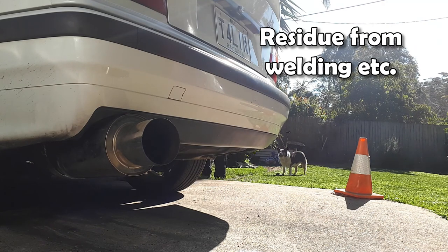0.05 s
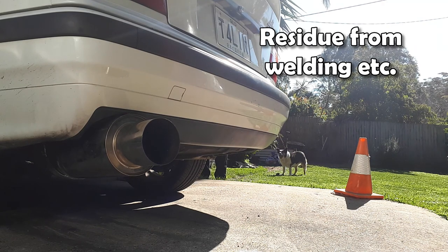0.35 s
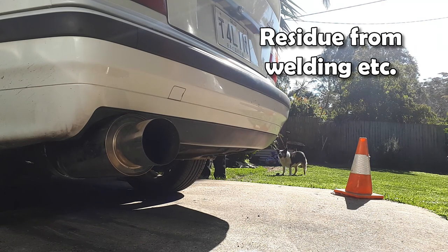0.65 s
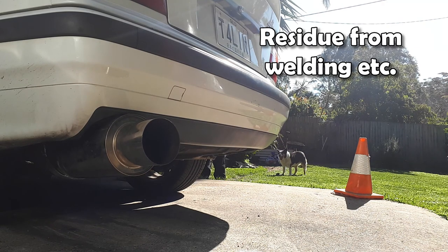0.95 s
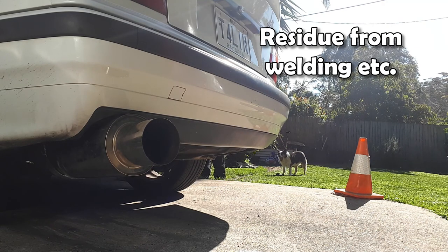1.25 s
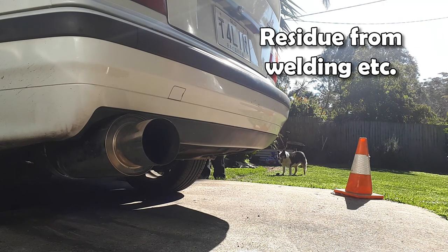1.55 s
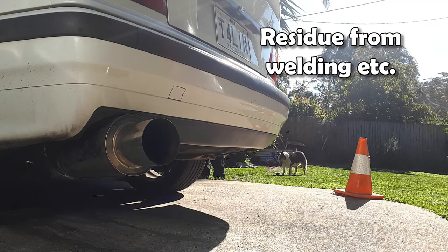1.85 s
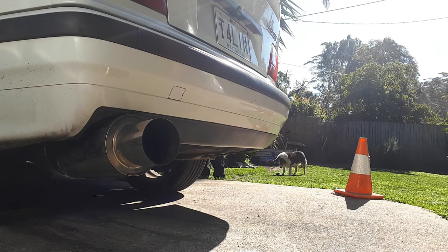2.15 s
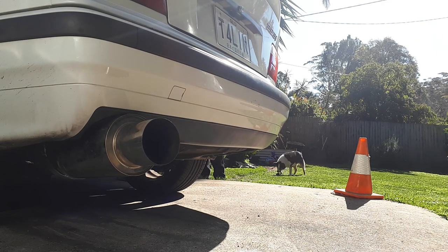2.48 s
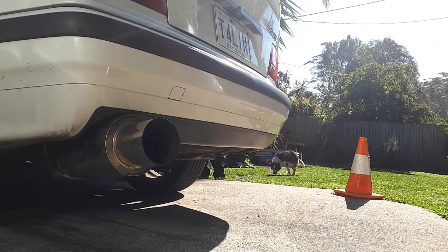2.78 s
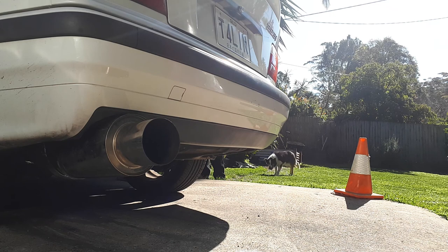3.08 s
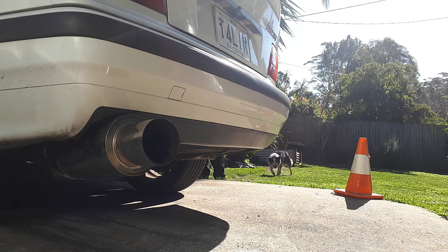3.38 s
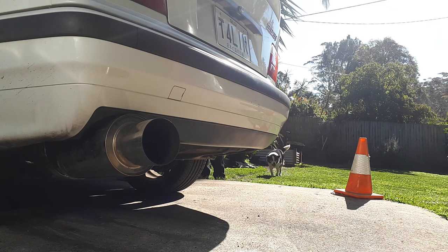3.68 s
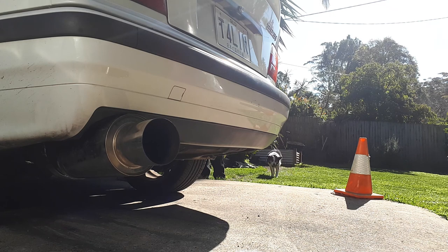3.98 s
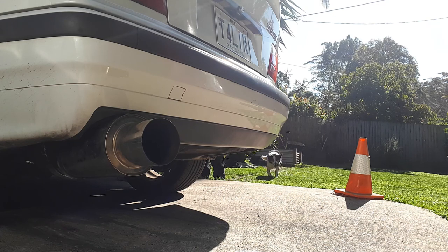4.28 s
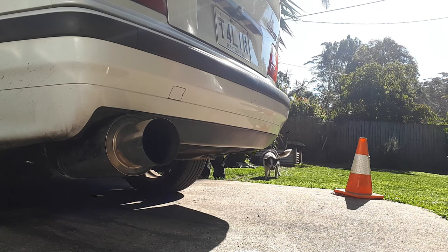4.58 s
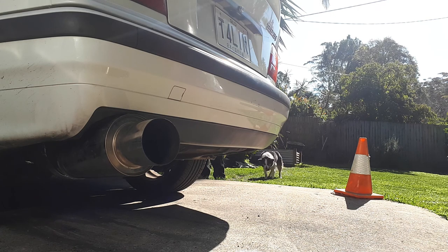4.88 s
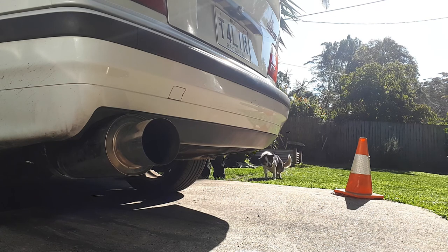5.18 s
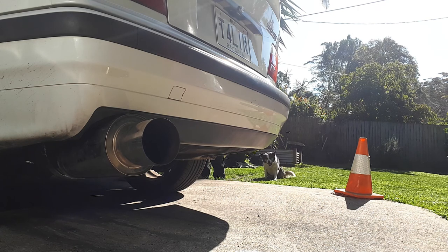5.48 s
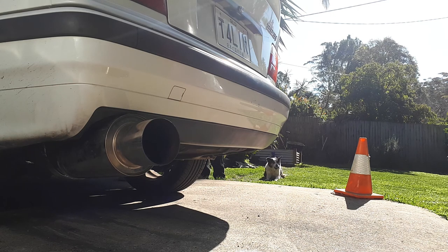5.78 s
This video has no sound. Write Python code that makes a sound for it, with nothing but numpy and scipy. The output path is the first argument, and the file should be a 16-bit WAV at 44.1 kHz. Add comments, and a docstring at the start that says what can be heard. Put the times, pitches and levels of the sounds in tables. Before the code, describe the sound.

A six-cylinder car idles with a deep, burbling exhaust and occasional sharp spits, slowly sinking into a harder lope.

```python
"""A six-cylinder car idles in a driveway, heard close to the mouth of its wide tailpipe.
From the start the exhaust booms on the firing orders, unequal puffs ring the pipe, gas rushes out and
each firing ticks, while the hiss and whine of the engine bay come from under the car.
After about a second and a half, sharper spits begin to crack now and then. Toward the end the fast idle
has sunk and the load has risen, so the exhaust lopes harder and the bay is louder."""
import sys
import numpy as np
from scipy import signal
from scipy.fft import rfft, irfft
from scipy.io import wavfile
from scipy.ndimage import uniform_filter1d, minimum_filter1d

SR = 44100
rng = np.random.default_rng(int(sys.argv[2]) if len(sys.argv) > 2 else 0)


def persist_wave(psi):
    """Save psi, clipped to +-1, as 16-bit WAV."""
    counts = np.round(np.clip(psi, -1, 1) * 32767).astype(np.int16)
    wavfile.write(sys.argv[1], SR, np.atleast_2d(counts).T)


N = 261954
TIME = np.arange(N) / SR


def amp(db):
    return 10 ** (np.asarray(db) / 20)


def unit_rms(x):
    return x / np.sqrt(np.mean(x ** 2) + 1e-20)


def shaped_noise(spectrum):
    """Noise of rms 1 through an EQ curve, falling 40 dB an octave beyond its ends."""
    hz, db = np.transpose(spectrum)
    f = np.fft.rfftfreq(N, 1 / SR) + 1
    octaves_outside = np.maximum(np.log2(f / hz[-1]), 0) + np.maximum(np.log2(hz[0] / f), 0)
    eq_db = np.interp(np.log(f), np.log(hz), db) - 40 * octaves_outside
    return unit_rms(irfft(rfft(rng.standard_normal(N)) * amp(eq_db), N))


def noise_band(centre_hz, half_width_hz):
    """A band of noise of rms 1; around 0 Hz it is a random drift."""
    f = np.fft.rfftfreq(N, 1 / SR)
    rolloff = np.sqrt(1 + ((f - centre_hz) / half_width_hz) ** 4)
    return unit_rms(irfft(rfft(rng.standard_normal(N)) / rolloff, N))


def pulse(firings, lag, width):
    """One smooth swell per firing; lag and width are in firing intervals."""
    return np.exp(-(((firings - lag + .5) % 1 - .5) / width) ** 2)


# The sinking idle: time_s, firing_rate_hz
IDLE_SPEED = [(0.0, 53.25), (0.6, 52.77), (0.9, 52.9), (1.2, 52.53), (1.55, 52.44), (1.9, 51.37),
              (2.4, 51.39), (2.9, 51.15), (3.3, 50.69), (3.8, 50.5), (4.1, 50.8), (4.3, 50.08),
              (4.7, 49.15), (5.0, 49.28), (5.4, 48.98), (5.94, 49.04)]
# The rising load: time_s, load_0_to_1
ENGINE_LOAD = [(0, 0.027), (1.35, 0.09), (1.9, 0.4), (3.0, .47), (4.05, .56), (4.45, 0.94), (5.94, 0.95)]


def idle():
    """The engine slows as its load rises; gives the running count of firings and the load."""
    rate_hz = np.interp(TIME, *np.transpose(IDLE_SPEED))
    load = np.interp(TIME, *np.transpose(ENGINE_LOAD))
    return .251 + np.cumsum(rate_hz) / SR, load


# The boom's tones, the half orders from two unequal manifold branches: multiple_of_firing_rate
BOOM_ORDERS = [1, 1.5, 2, 2.5, 3, 3.5, 4, 5]
# Their balance, a row per tone: unloaded_db, loaded_db, knee_load_0_to_1 (where loaded_db is reached)
BOOM_LEVELS = [(-28, -22.5, .9), (-40, -39.5, .5), (-14, -11, .2), (-35.5, -28.5, 0.2), (-10.5, -14, 0.95),
               (-34, -15.5, .95), (-25.5, -31, 0.8), (-27, -46, .36)]


def exhaust_boom(firings, load):
    """The silencer passes the low firing orders as tones; load shifts their mix, the crank trembles."""
    trembling = firings + .003 * noise_band(0, 18)
    tones = np.zeros(N)
    for order, (unloaded_db, loaded_db, knee) in zip(BOOM_ORDERS, BOOM_LEVELS):
        level = np.interp(load, [0, knee], amp([unloaded_db, loaded_db]))
        smear_rad = .55 * (order - 2) ** 2  # the chambers hold the lower tones back longer
        tones += level * np.cos(2 * np.pi * order * trembling + smear_rad)
    return np.sqrt(2) * tones * amp(.13 * noise_band(0, 18))


# The lope, a row per cylinder in firing order: lag_intervals, puff_db, tilt_db_per_octave,
# full_load_gain_db, full_load_extra_lag_intervals, branch_ring_hz, full_load_ring_db
CYLINDERS = [(0.965, -1.9, -3.9, -1.2, 0.077, 481, 9.6), (0.639, -4.8, -4.6, 3.4, 0.056, 464, 4.6),
             (0.607, -9.1, 2.8, 0.8, 0.104, 328, 14.0), (0.605, -0.1, -5.2, -12.3, 0.055, 283, 14.0),
             (0.594, -5.7, -2.2, 3.8, 0.124, 429, 8.9), (0.793, -3.5, -5.7, 2.1, 0.073, 232, 3.5)]
# The tailpipe's ring: pitch_hz, gain_db, t60_s
PIPE_MODES = [(206, -8.1, 0.098), (288, 6.6, 0.158), (342, -0.5, 0.108), (407, 2.9, 0.049),
              (473, -4.8, 0.039), (545, -23.1, 0.088), (656, -13.3, 0.083)]


def exhaust_burble(firings, load):
    """Each cylinder's puff rings its manifold branch, then the pipe: a lope six firings long."""
    scatter_db, jitter_intervals, branch_width_hz = .9, .006, 70
    f = np.fft.rfftfreq(SR // 2, 1 / SR) + 1
    pipe = sum(amp(db) * hz / ((1j * f + np.log(1000) / (2 * np.pi * t60)) ** 2 + hz ** 2)
               for hz, db, t60 in PIPE_MODES)
    silencer = 1 / np.sqrt((1 + (200 / f) ** 12) * (1 + (f / 635) ** 16))  # passes 200-635 Hz
    puffs, pre_roll = np.zeros(N + SR), SR // 20
    for k, (size, late) in enumerate(rng.standard_normal((int(firings[-1]) + 1, 2))):
        lag, puff_db, tilt, load_db, load_lag, ring_hz, ring_db = CYLINDERS[k % len(CYLINDERS)]
        effort = np.interp(k, firings, load)
        start_s = np.interp(k + lag + load_lag * effort + jitter_intervals * late, firings, TIME)
        level_db = puff_db + load_db * effort + scatter_db * size
        tilt_db = tilt * np.log2(f / 300)
        branch_db = ring_db * (.3 + .7 * effort) * np.exp(-((f - ring_hz) / branch_width_hz) ** 2)
        puff = irfft(pipe * silencer * amp(level_db + tilt_db + branch_db))
        puffs[round(start_s * SR):][:len(puff)] += np.roll(puff, pre_roll)
    soften_db = np.interp(load, [0, .35], [-2.2, 0])  # the unloaded engine puffs more softly
    return amp(-20 + soften_db) * unit_rms(puffs[pre_roll:][:N])


# EQ of the dark rush in the pipe: frequency_hz, gain_db
GAS_EQ = [(12, -17.5), (25, -3.5), (45, -8), (100, -2), (170, -5.5), (240, -6), (300, -6), (420, -5),
          (520, -5.5), (640, -13.5), (760, -28), (1100, -45)]


def gas_rush(firings, load):
    """Turbulence surges out of the pipe with each puff."""
    surge = .5 + pulse(firings, lag=.9, width=1.0)
    return amp(-36 + 3 * load) * unit_rms(shaped_noise(GAS_EQ) * surge)


# The pings that make up a tick: pitch_hz, half_length_s, level_db, full_load_gain_db
TICK_PINGS = [(1482, 0.0022, -40.5, 0.5), (1890, 0.0021, -55, 7), (3050, 0.0009, -46.5, 7)]


def firing_ticks(firings, load):
    """The front of each puff pings at the pipe's mouth, never twice the same."""
    scatter_db, jitter_intervals = 1.4, .015
    ticks = np.zeros(N)
    offsets = np.arange(-SR // 100, SR // 100)
    t = offsets / SR
    draws = rng.standard_normal((int(firings[-1]), 2 + len(TICK_PINGS)))
    for k, (size, late, *ping_sizes) in enumerate(draws):
        centre = np.searchsorted(firings, k + .85 + jitter_intervals * late)
        span = np.clip(centre + offsets, 0, N - 1)
        for (hz, half_length_s, db, load_db), ping_size in zip(TICK_PINGS, ping_sizes):
            pitch_hz = hz * rng.uniform(.85, 1.066)
            ping = np.exp(-(t / half_length_s) ** 2) * np.cos(2 * np.pi * (pitch_hz * t + rng.random()))
            ticks[span] += amp(db + load_db * load[centre] + scatter_db * (size + ping_size)) * ping
    return np.sqrt(2) * ticks


# The whine's tones: multiple_of_firing_rate
WHINE_ORDERS = [18, 42, 88.4]
# Their balance, a row per tone: unloaded_db, full_load_gain_db
WHINE_LEVELS = [(-69.5, 16.5), (-71, 16.5), (-79.5, 12)]


def belt_whine(firings, load):
    """Belt-driven parts sing on high multiples of the engine speed, more so under load."""
    tones = np.zeros(N)
    for order, (db, load_db) in zip(WHINE_ORDERS, WHINE_LEVELS):
        waver_rad = .25 * noise_band(0, 4.1)
        tones += amp(db + load_db * load) * np.cos(2 * np.pi * order * firings + waver_rad)
    return np.sqrt(2) * tones


# EQ of the engine bay's hiss: frequency_hz, gain_db
HISS_EQ = [(300, -5), (750, 1), (1000, 1.5), (1350, -0.5), (2000, -2), (2400, -3.5), (3600, -7.5),
           (4800, -7.5), (5300, -13), (6000, -10), (7600, -12.5), (8700, -20), (11700, -21), (15700, -20.5)]
# Thin steady whistles on top: pitch_hz, width_hz, level_against_hiss_db
BAY_WHISTLES = [(1948, 45, -14), (3580, 15, -20.5), (4170, 29, -22.5), (9700, 150, -26.5),
                (10120, 190, -27.5), (11700, 300, -27.5)]


def bay_hiss(firings, load):
    """Fan and intake give a fluttering hiss with thin whistles, louder under load."""
    unloaded_db, load_db = -48.5, 5.7
    flutter = amp(1.1 * noise_band(0, 60)) * (1 + .15 * pulse(firings, lag=.8, width=.25))
    whistles = sum(amp(db) * noise_band(hz, width_hz / 2) for hz, width_hz, db in BAY_WHISTLES)
    return amp(unloaded_db + load_db * load) * (flutter * shaped_noise(HISS_EQ) + whistles)


# Sharp accents at the pipe's mouth: centre_s, envelope_peak_db
SPITS = [(1.582, -37), (1.817, -44), (2.2993, -44), (2.5138, -45), (3.0416, -38), (3.573, -41),
         (3.7515, -42), (4.265, -39), (4.3855, -41), (4.4055, -45), (4.668, -43), (5.2975, -42)]


def pipe_spits():
    """Now and then a puff leaves with a drier, louder crack."""
    half_length_s = .0014
    bursts = sum(amp(db) * np.exp(-((TIME - centre_s) / half_length_s) ** 2) for centre_s, db in SPITS)
    return bursts * noise_band(3050, 400)


def place(x, left_lead_ms, right_db):
    """Stereo placement: the sound arrives first on the left and is right_db louder on the right."""
    delayed = np.interp(TIME - left_lead_ms / 1000, TIME, x)
    return np.array([x * amp(-right_db / 2), delayed * amp(right_db / 2)])


def scene():
    """Speed and load drive the exhaust, its ticks and the engine bay; spits land on top."""
    firings, load = idle()
    boom = place(exhaust_boom(firings, load), left_lead_ms=.11, right_db=1.8)
    puffs = place(exhaust_burble(firings, load) + gas_rush(firings, load), left_lead_ms=.185, right_db=2)
    whine = place(belt_whine(firings, load), left_lead_ms=.14, right_db=0)
    # scattered under the car, the hiss is different on each side
    hiss = np.array([bay_hiss(firings, load), amp(1.06) * bay_hiss(firings, load)])
    cracks = place(firing_ticks(firings, load) + pipe_spits(), left_lead_ms=.45, right_db=.2)
    return boom + puffs + whine + hiss + cracks


def record(dry):
    """A smooth limiter holds the boom's crests under full scale; a steep low-pass trims the top."""
    ceiling, hold, cutoff_hz = .99, SR // 40, 15720
    allowed = minimum_filter1d(ceiling / np.maximum(abs(dry).max(0), ceiling), hold)
    gain = uniform_filter1d(uniform_filter1d(allowed, hold // 2), hold // 2)
    low_pass = signal.firwin(1023, cutoff_hz, window=("kaiser", 9), fs=SR)
    return signal.oaconvolve(dry * gain, low_pass[None], "same")


dry = scene()
out = record(dry)
persist_wave(out)
```